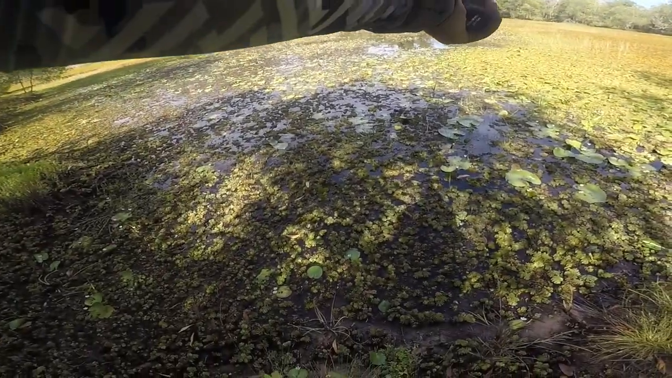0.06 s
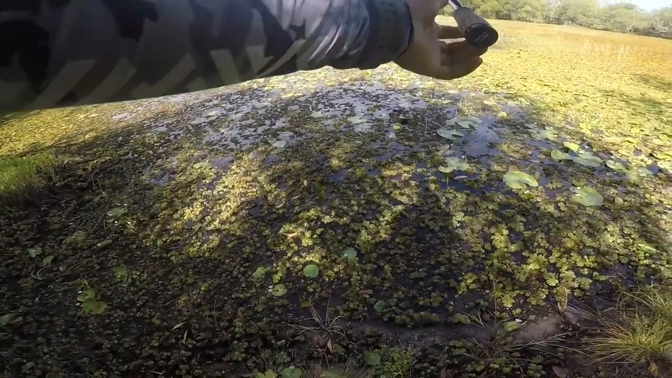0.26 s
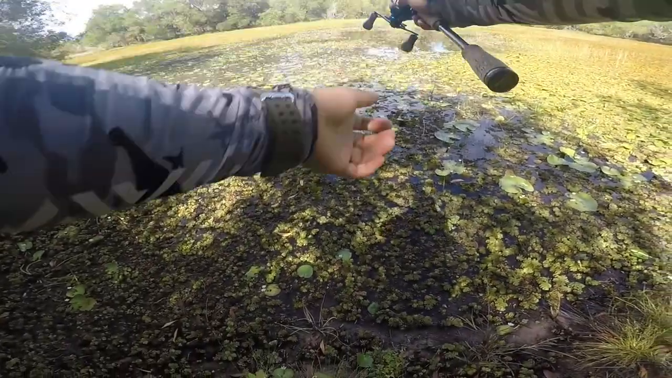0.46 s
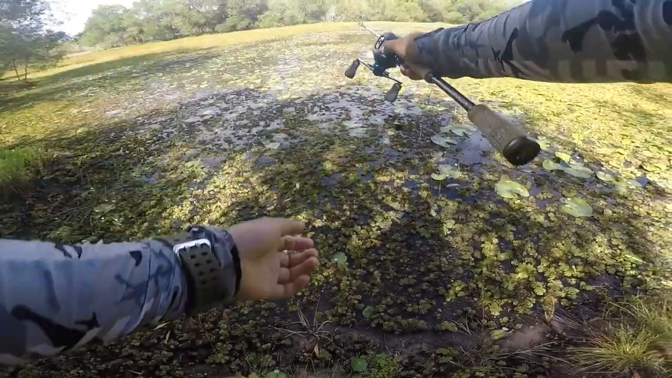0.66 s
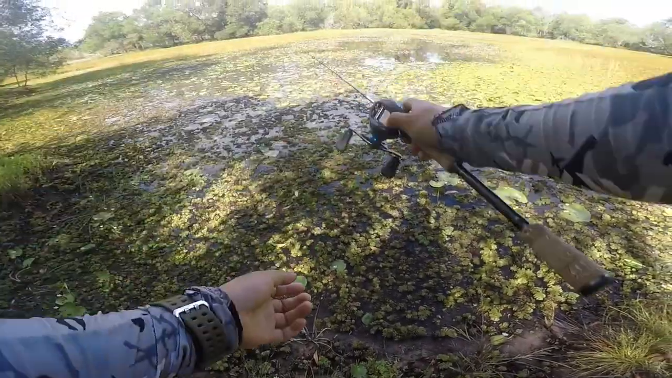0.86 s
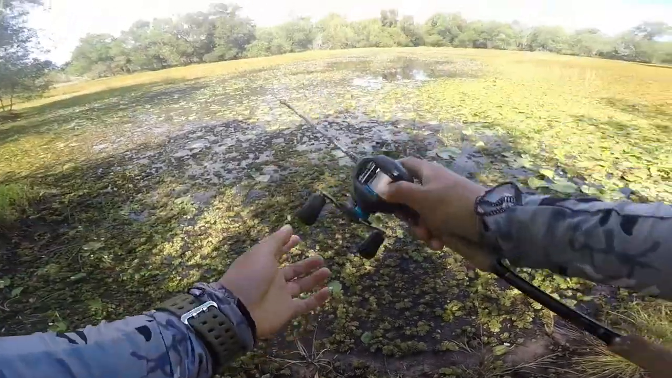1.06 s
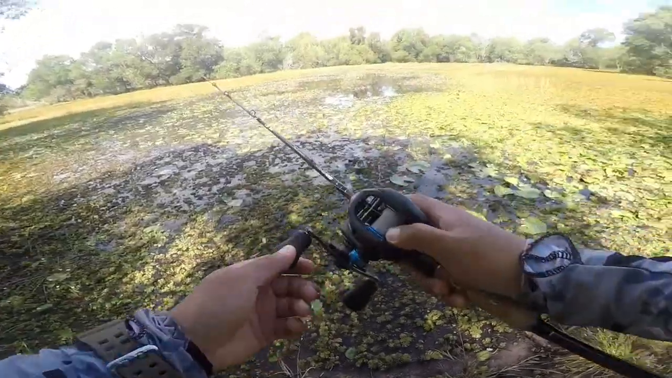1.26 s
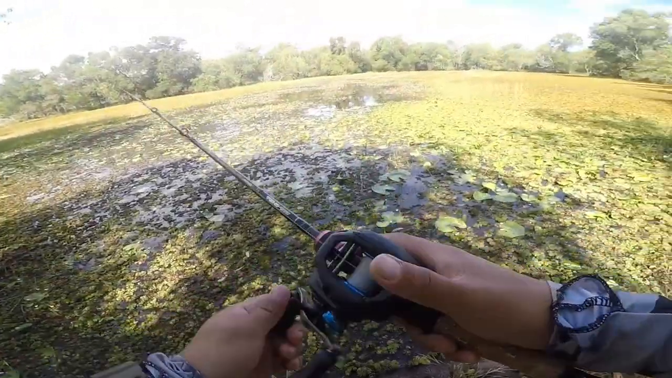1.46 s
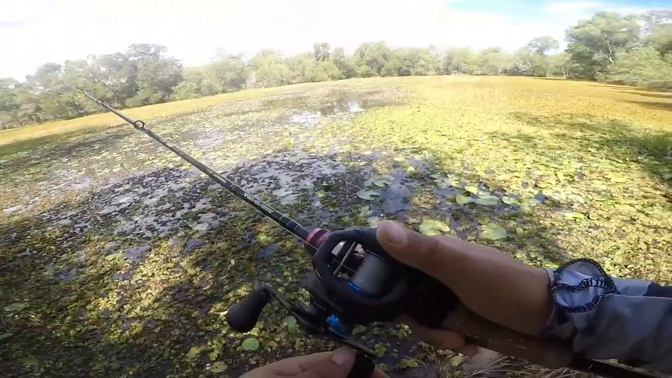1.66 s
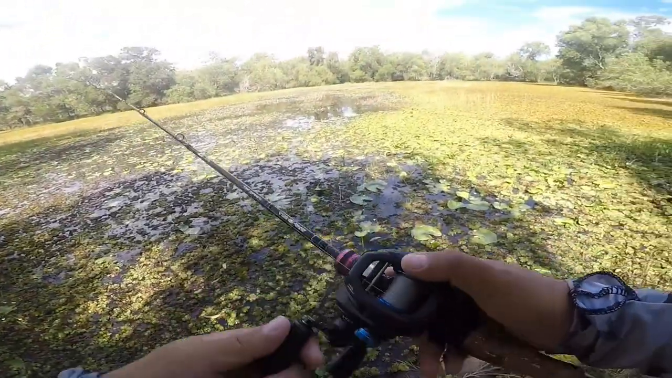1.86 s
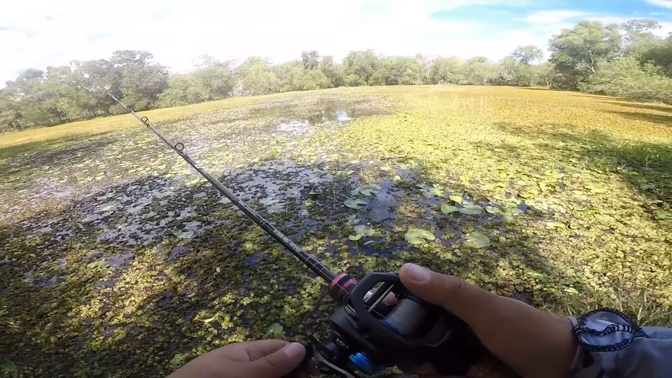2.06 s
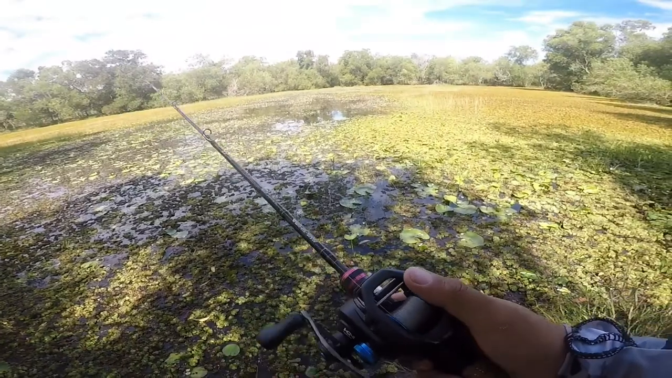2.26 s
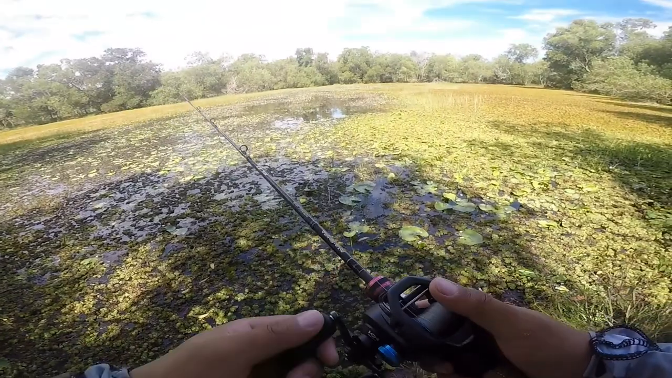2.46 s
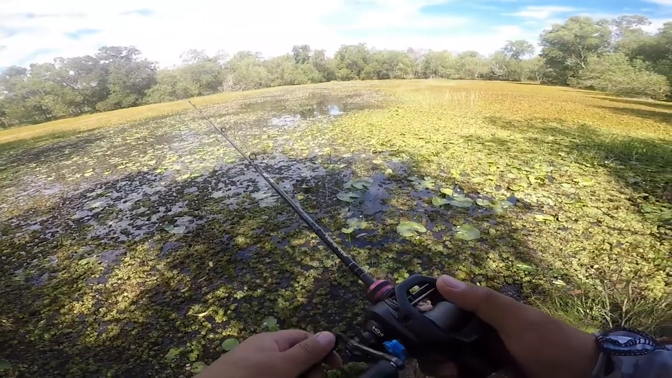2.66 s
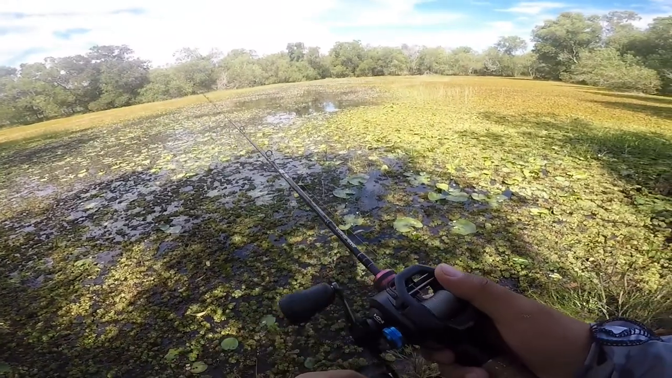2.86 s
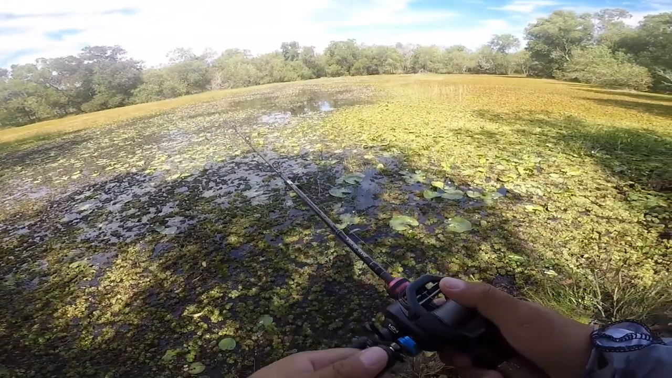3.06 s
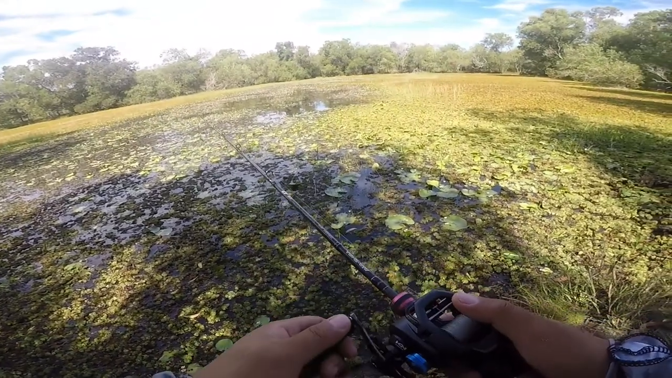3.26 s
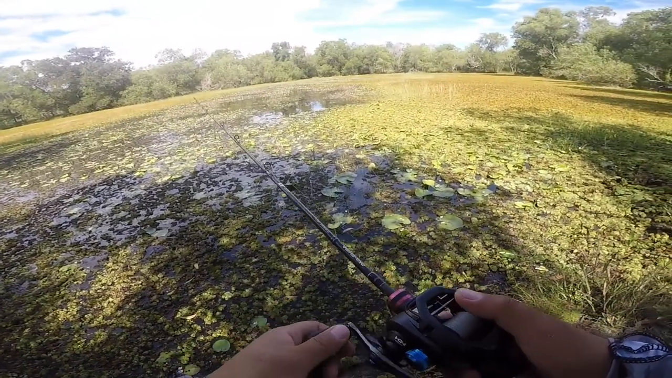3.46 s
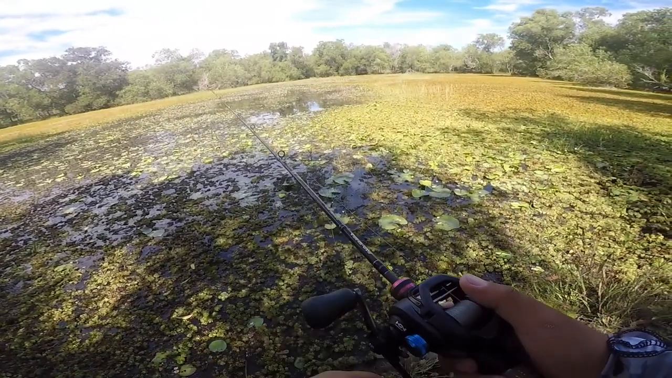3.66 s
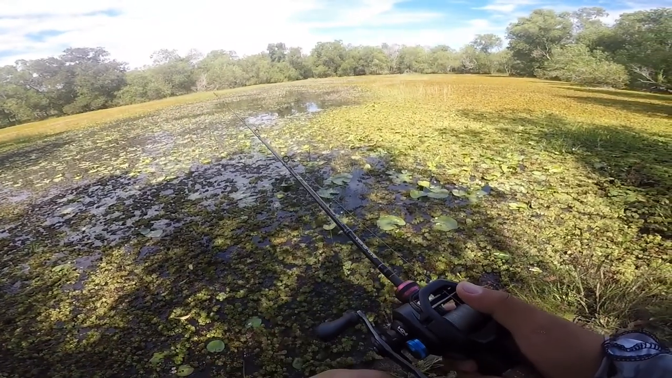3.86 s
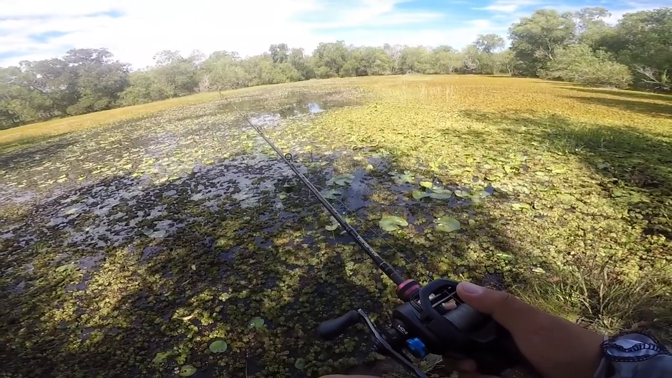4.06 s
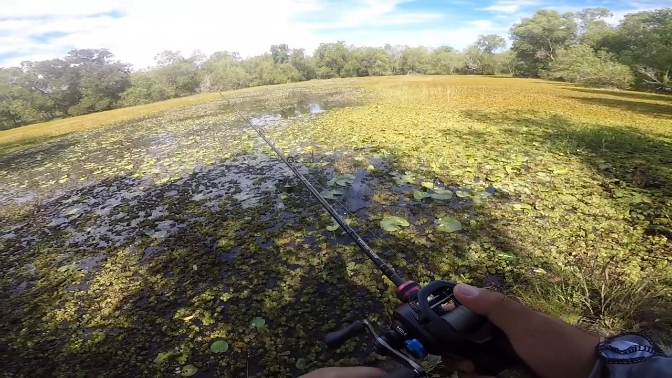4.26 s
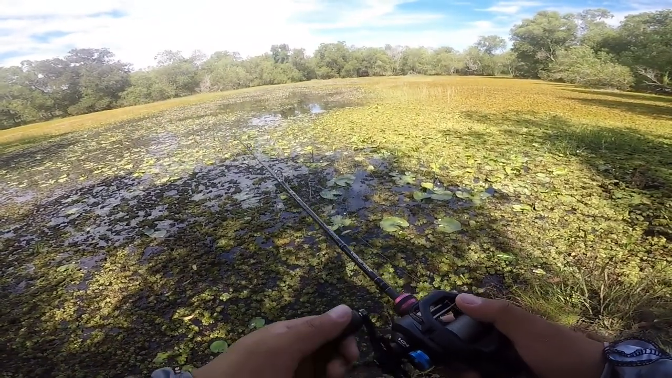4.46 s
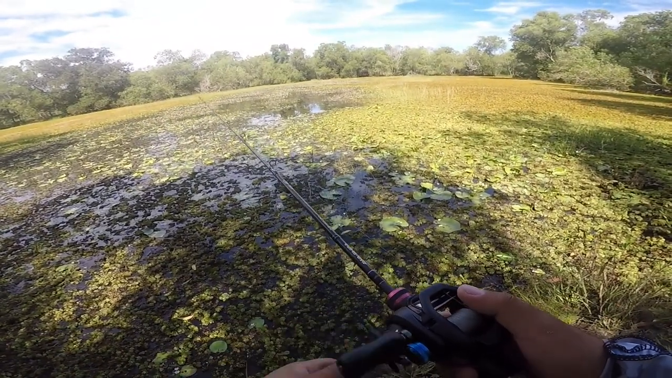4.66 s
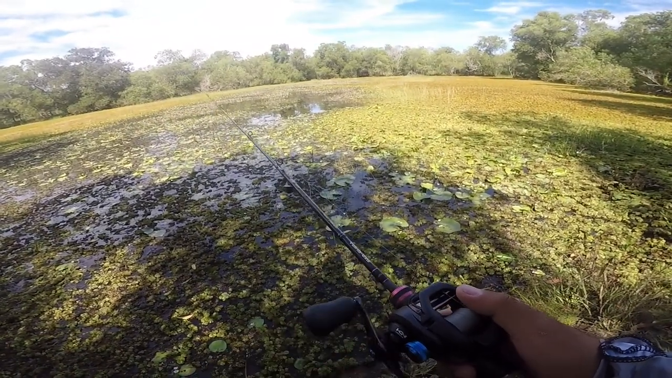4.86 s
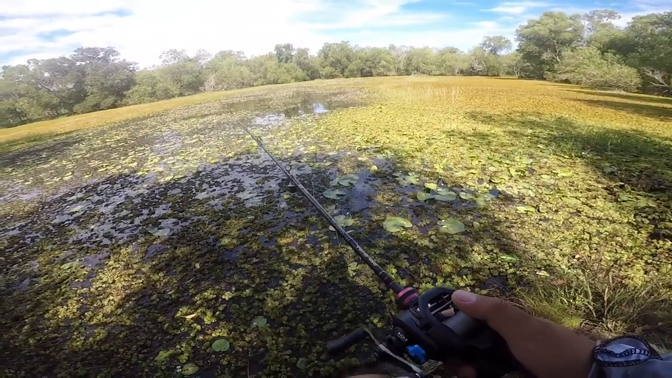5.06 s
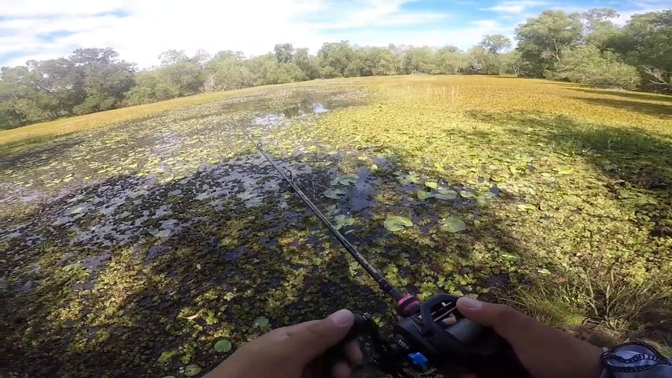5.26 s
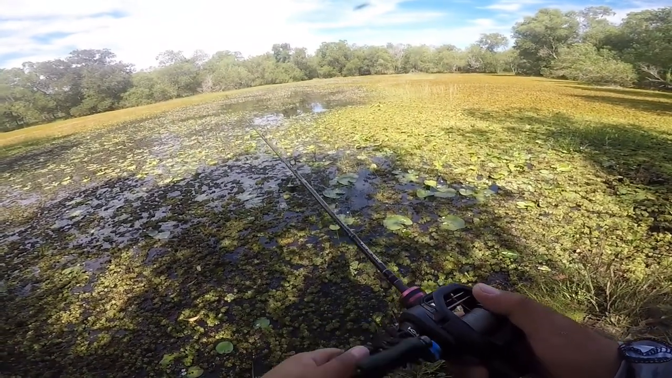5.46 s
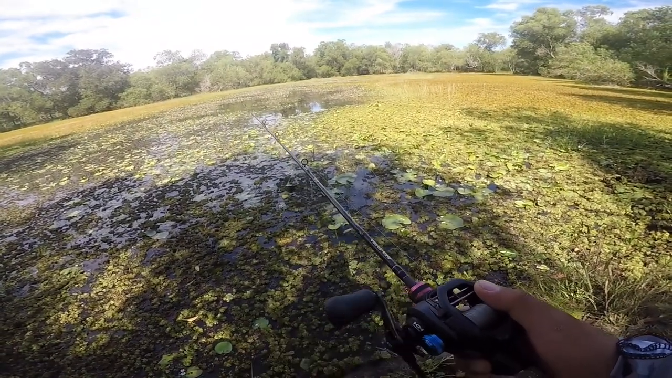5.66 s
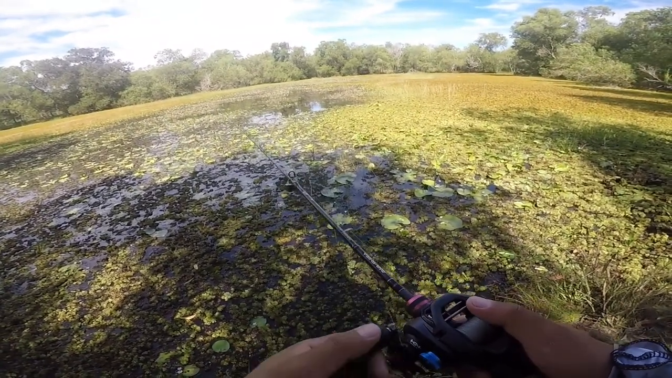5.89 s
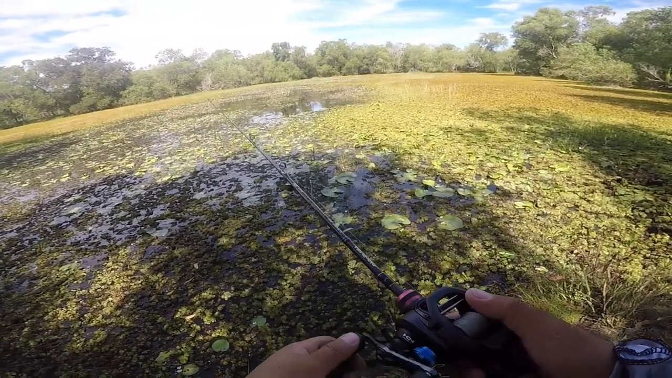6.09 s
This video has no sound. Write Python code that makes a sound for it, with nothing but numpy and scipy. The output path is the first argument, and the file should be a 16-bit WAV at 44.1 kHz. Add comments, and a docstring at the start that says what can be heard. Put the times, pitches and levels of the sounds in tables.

```python
"""Reel clutch and rubbed camera at a swamp

An angler with a chest camera follows through a cast. Sleeves and harness rub, bump and tick on its housing:
noise and pulses ring resonances. The reel's clutch snaps in: short cracks ring the frame.
Far birds whistle as gliding sines, insects trill on the right as pulsed tones, breeze and rumble are shaped noise.
Two microphone ports hear the mid range of far song and air nearly in opposite phase.
"""
import sys
import numpy as np
from scipy import signal
from scipy.fft import rfft, irfft, next_fast_len
from scipy.io import wavfile
from scipy.ndimage import uniform_filter1d, map_coordinates

SR = 44100
rng = np.random.default_rng(int(sys.argv[2]) if len(sys.argv) > 2 else 0)


def to_wav(s):
    """Save 16-bit WAV."""
    ch = np.atleast_2d(s).T  # columns
    pcm = np.round(np.clip(ch, -1, 1) * 32767)  # PCM
    wavfile.write(sys.argv[1], SR, pcm.astype(np.int16))


N = 270333

# housing resonances, low to high: case, strap, shell, crisp edge of a tick
# [f/Hz, width of one pass/Hz, ports alike/dB, ports opposed/dB]
CASE_MODES = [(160.9, 64, -1, -28), (209.6, 134, -3, -9.5), (271.3, 102, -11, -10.5)]
STRAP_MODES = [(282, 230, -10, -21.5), (378.8, 33, -7.5, 7.5), (528, 145, -2, 1.5), (656, 27, -3, -9)]
SHELL_MODES = [(875, 256, -11, 0), (1070, 196, -5.5, 5.5), (1283, 200, -5, 4), (1414, 140, -4.5, -14),
               (1648, 226, -6.5, -19), (1914, 220, -10, 1.5), (2177, 210, -16, -14), (2512, 150, -8.5, -19),
               (2735, 156, -9.5, -14), (3540, 280, -18, -33), (6400, 3200, -21, -20)]
RATTLE_MODES = [(1095, 320, -12, -4.5), (1806, 840, -18, -13), (2710, 370, -21.5, -44)]


def amp(db):
    """Amplitude factor of a level in dB."""
    return 10 ** (np.asarray(db) / 20)


def unit(x):
    """x scaled to an rms of 1 over all its rows."""
    return x / np.sqrt(np.mean(x ** 2) + 1e-20)


def along(points, hz):
    """Interpolate (f/Hz, value) points on a log frequency axis."""
    f, v = np.transpose(points)
    return np.interp(np.log(hz + 1), np.log(f + 1), v)


def curves(rows):
    """One value per sample for each column after the time."""
    s, *cols = np.transpose(rows)
    return [np.interp(np.arange(N) / SR, s, c) for c in cols]


def wobble(knots_per_s):
    """Smooth random curve through normal knots."""
    knots = rng.standard_normal(int(N * knots_per_s / SR) + 4)
    return map_coordinates(knots, [np.arange(N) * knots_per_s / SR])


def filtered(x, response):
    """x times a complex response of frequency."""
    m = next_fast_len(N + SR // 2)
    return irfft(rfft(x, m) * response(np.fft.rfftfreq(m, 1 / SR)), m)[..., :N]


def housing():
    """Drag, bumps and ticks drive the same resonances; the two motions become left and right."""
    alike, opposed = (drag() + bumps() + ticks()) / np.sqrt(2)
    return np.array([alike + opposed, alike - opposed])


def drag():
    """Cloth friction: low push on the case, strap creak, scrape on the shell, threads snapping free."""
    # cloth over the housing [t/s, push level/dB, scrape level/dB]
    rub = [(0.0, -44.5, -48), (0.15, -40, -39.5), (0.2, -43.5, -44.5), (0.25, -36, -35.5),
           (0.28, -39.5, -40.5), (0.308, -49, -43), (0.316, -41, -32), (0.36, -29.5, -34),
           (0.385, -46, -38), (0.425, -35.5, -38.5), (0.443, -38, -32.5), (0.455, -42, -37.5),
           (0.53, -36.5, -39.5), (0.63, -41, -40), (0.665, -45, -36.5), (0.7, -39, -41.5),
           (0.77, -35.5, -31), (0.81, -32, -34), (0.83, -32.5, -43), (0.87, -36, -34), (0.885, -46, -38),
           (0.95, -35, -33.5), (1.05, -34.5, -36.5), (1.14, -38, -36), (1.2, -32, -35), (1.28, -35, -32.5),
           (1.33, -46.5, -43), (1.45, -49.5, -51.5), (1.62, -50, -49), (1.66, -45, -42.5), (1.87, -46, -45),
           (1.95, -50, -56), (2.08, -50, -50), (2.25, -49.5, -67), (2.31, -49, -48), (2.37, -45, -48),
           (2.48, -45.5, -45), (2.52, -51.5, -56), (2.7, -48.5, -52), (2.82, -54, -58), (3.0, -49.5, -51),
           (3.04, -48, -42), (3.075, -52, -45), (3.1, -51, -46), (3.25, -49.5, -52), (3.4, -52.5, -61.5),
           (6.13, -53, -55)]
    strap_under_push_db, crackle_under_scrape_db = 8.5, 6
    fidget_db, fidget_knots_per_s = 0.96, 9.8
    snaps_per_s = 260
    push_db, scrape_db = curves(rub)
    strap_db = push_db - strap_under_push_db
    push_db, strap_db, scrape_db = (
        db + fidget_db * wobble(fidget_knots_per_s) for db in (push_db, strap_db, scrape_db))

    push = through(fibres(spread_db=1.8, clumps_per_s=40, tie=0.23), CASE_MODES)
    creak = through(fibres(spread_db=2.5, clumps_per_s=60, tie=0.29), STRAP_MODES)
    scrape = through(fibres(spread_db=2.7, clumps_per_s=150, tie=-0.022), SHELL_MODES)
    snaps = (rng.random(N) < snaps_per_s / SR) * rng.standard_normal((2, N))
    crackle = through(snaps, RATTLE_MODES)

    touch = amp(push_db) * unit(push) + amp(strap_db) * unit(creak)
    touch = touch + amp(scrape_db) * unit(scrape)
    return touch + amp(scrape_db - crackle_under_scrape_db) * unit(crackle)


def fibres(spread_db, clumps_per_s, tie):
    """Friction force: clumped grains; tie is the correlation between alike and opposed motion."""
    grain_db = 2.2  # size scatter of single fibres catching
    a, b = rng.standard_normal((2, N))
    size_db = spread_db * wobble(clumps_per_s) + grain_db * rng.exponential(size=N)
    return unit(np.array([a, tie * a + np.sqrt(1 - tie ** 2) * b]) * amp(size_db))


def bumps():
    """Soft contact: a raised-sine force pulse shakes case and strap."""
    # bumps [t/s, case drive/dB, strap drive above it/dB, contact time/s, clipped below]
    hits = [(0.033, -37.5, -5, 0.0029), (0.356, -29.5, -4.5, 0.0017), (0.43, -15.5, -3, 0.0064),
            (0.774, -36, -9, 0.002), (0.782, -28, -5, 0.002), (0.795, -35, -1, 0.0016),
            (0.811, -25.5, -22, 0.0035), (0.839, -31, -8, 0.0015), (0.85, -29, -14, 0.002),
            (0.858, -34, -5, 0.0011), (0.865, -28, -22, 0.0029), (0.969, -15, -18, 0.002),
            (1.204, -16, 2, 0.004), (1.25, -25, -27, 0.0022), (1.368, -26.5, -2.5, 0.0026),
            (1.385, -25.5, -22, 0.0046), (1.566, -18.5, -33, 0.0048), (1.653, -30, -19, 0.0026),
            (1.751, -19.5, -39, 0.003), (1.772, -25, -26, 0.0017), (1.838, -33, -21, 0.0034),
            (1.924, -31.5, -20, 0.0025), (1.967, -25, -31, 0.0053), (2.011, -29, -31, 0.004),
            (2.049, -19.5, -35, 0.0049), (2.181, -17, -11, 0.0054), (2.415, -34, -20, 0.00047),
            (2.459, -37, -7, 0.0024), (2.546, -15, -21, 0.0071), (2.683, -21.5, -33, 0.0059),
            (2.718, -30, -22, 0.0035), (3.079, -32, -4, 0.0029), (3.122, -35, -7, 0.0018),
            (3.145, -39, -10, 0.0023), (3.618, -25, -24, 0.0054), (3.803, -35.5, -10, 0.0022),
            (4.623, -31.5, -19, 0.0046), (6.075, -23.5, -24, 0.0039)]
    thumps, creaks = np.zeros((2, N + SR))
    t = np.arange(SR // 100) / SR
    for s, db, above_db, contact_s in hits:
        blow = np.sin(np.pi * np.clip(t / np.clip(contact_s, .0005, .009), 0, 1)) ** 2
        blow = blow / blow.sum()  # same impulse whatever the contact time
        here = slice(round(s * SR), round(s * SR) + len(t))
        thumps[here] += amp(db + 47.5) * blow
        creaks[here] += amp(db + above_db + 52.0) * blow
    return through(thumps[:N], CASE_MODES) + through(creaks[:N], STRAP_MODES)


def ticks():
    """Dry contact: an impulse with scratch rattles crisply; a softened copy rings shell and strap."""
    # ticks on the shell [t/s, drive/dB, hardness/dB]
    taps = [(0.031, -27, 1), (0.095, -43, 1), (0.13, -40, 2), (0.25, -34, -2), (0.311, -32, -4),
            (0.326, -33, -6), (0.746, -30, -0.5), (0.798, -24, 3), (0.806, -28.5, -1.5), (0.841, -42, -7),
            (0.851, -37, -3), (0.858, -31, -1), (0.966, -14.5, -1), (1.075, -28.5, -1), (1.207, -32, -9),
            (1.569, -33, 2), (1.632, -44, -1), (1.755, -29, 1.5), (1.778, -28, 2.5), (1.902, -38, -1.5),
            (1.967, -36, -2), (2.011, -24.5, 4.5), (2.052, -35.5, -5), (2.078, -33, 1), (2.106, -34, 1),
            (2.185, -35, -3), (2.312, -38, 2.5), (2.322, -45, 1), (2.343, -43, 5), (2.365, -44, 5),
            (2.411, -25.5, 2.5), (2.426, -33, 2.5), (2.546, -31, 3), (2.555, -37, 0), (2.617, -39, 0),
            (2.691, -36, -1.5), (2.876, -41, -3), (2.937, -38, -1.5), (2.974, -48, 0), (3.026, -42, 4),
            (3.042, -38.5, 2), (3.055, -39, 2), (3.06, -39, 1), (3.098, -35, 3.5), (3.128, -43, 5),
            (3.179, -31.5, 1.5), (3.189, -38, -1), (3.25, -53, 0), (3.289, -39, -1), (3.541, -37, -1),
            (3.619, -36.5, -1), (4.783, -39.5, -0.5), (5.431, -35.5, 2.5), (5.565, -35, 2.5),
            (5.954, -40, 0.5), (6.076, -26.5, 0)]
    soft_hz, strap_db, ring_db = 2460, -3.5, -6
    force = np.zeros((2, N + SR))
    t = np.arange(SR // 100) / SR
    grit = rng.standard_normal((len(taps), len(t))) * amp(-60 * t / 0.014)
    for k, ((s, db, hardness_db), scratch) in enumerate(zip(taps, grit)):
        snap = signal.unit_impulse(len(t)) + 0.26 * scratch
        # a harder contact adds its slope
        snap = snap + 2.95 * (amp(hardness_db) - 1) * np.gradient(snap)
        # alternate sides: the opposed motion flips sign
        force[:, round(s * SR):][:, :len(t)] += amp(db + 35.5) * np.outer([1, (-1) ** k], snap)
    force = force[:, :N]
    soft = filtered(force, lambda f: 0.61 / (1 + 1j * f / soft_hz) ** 3)
    ring = amp(ring_db) * through(soft, SHELL_MODES)
    shake = amp(strap_db) * through(soft, STRAP_MODES)
    return through(force, RATTLE_MODES) + ring + shake


def through(force, modes):
    """Force through resonances, the camera's low cut and a soft treble roll-off."""
    low_cut_hz, q, roll_off_hz = 143, 0.96, 6000

    def response(f):
        u = f / low_cut_hz
        low_cut = (1j * u) ** 2 / (1 + 1j * u / q - u ** 2)
        return resonant(modes, f) * low_cut ** 3 / (1 + 1j * f / roll_off_hz) ** 2

    return filtered(force, response)


def resonant(modes, f):
    """Causal resonances, each applied twice for steep skirts; rows: ports alike, ports opposed."""
    total = 0
    for hz, width_hz, alike_db, opposed_db in modes:
        peak = 1j * f * width_hz / (hz * hz - f * f + 1j * f * width_hz)
        total = total + amp([[alike_db], [opposed_db]]) * peak ** 2
    return total


def clutch():
    """Each contact is a short crack that rings the reel frame, differently toward each port."""
    # clutch contacts [t/s, drive/dB, ring at 3.4-6.5 kHz above it/dB, treble and crack above it/dB]
    contacts = [(1.3551, -9.5, -9, -1), (1.3675, -7.5, -7, -3.5), (1.3699, -6, 6, 5), (1.3722, -12, 1, 5),
                (1.375, -8, -10, -6)]
    # reel frame modes [f/Hz, level/dB, twice the 60 dB decay time/s]
    reel = [(516, -10.5, 0.022), (1140, -21, 0.018), (1555, -10, 0.038), (1930, -8, 0.024),
            (2250, 2, 0.0089), (2720, -4, 0.019), (3000, 4.5, 0.018), (3660, 3, 0.011), (4220, 2.5, 0.0088),
            (5550, 10, 0.01), (6160, 4, 0.01), (7340, 3, 0.0082), (8100, -5, 0.016), (9200, -10.5, 0.015),
            (11100, -16, 0.0057), (12500, -33, 0.012)]
    # balance of the reel [f/Hz, left minus right/dB]
    reel_lean = [(700, -3), (1300, 8), (2400, -4), (7000, -1), (10000, -11), (15000, 1)]
    low_cut_hz = 457  # the small frame radiates little below this
    out, t = np.zeros((2, N)), np.arange(SR // 10) / SR
    hz, level_db, twice_t60_s = np.transpose(reel)[..., None]
    for s, db, middle_db, treble_db in contacts:
        start = 2 * np.pi * rng.random(hz.shape)
        for port, turn in zip(out, (1, -1)):
            tilt_db = np.where(hz > 6500, treble_db, middle_db * (hz > 3400))
            tilt_db = tilt_db + rng.normal(0, 0.73, hz.shape)
            decay = amp(level_db + tilt_db - 60 * t / (.5 * twice_t60_s))
            ring = decay * np.sin(2 * np.pi * hz * t + start + 0.72 * turn)
            noise = uniform_filter1d(rng.standard_normal(len(t)), size=3)
            crack = 0.55 * amp(treble_db - 60 * t / 0.021) * noise
            attack = 1 - np.exp(-t / 0.00066)
            port[round(s * SR):][:len(t)] += amp(db - 7.5) * (ring.sum(0) + crack) * attack

    def radiation(f):
        return (1j * f / (low_cut_hz + 1j * f)) ** 2 * amp(along(reel_lean, f) / [[2], [-2]])

    out = filtered(out, radiation)
    tail = amp(-60 * t / 0.15) * rng.standard_normal((2, len(t)))
    return out + amp(-20) * reverberated(out, tail)


def reverberated(x, tail):
    """Convolve with a decaying noise tail, scaled to unit energy by its left row."""
    return signal.fftconvolve(x, tail / np.linalg.norm(tail[0]), axes=1)[:, :N]


def birds():
    """Far song is smeared by the trees on its way; peeps come clear across the water."""
    # calls that shoot up and drop again [top t/s, top f/Hz, rise/s, fall/s, drive/dB]
    arches = [ (1.902, 5780, .032, .033, -64), (2.507, 6120, .004, .028, -61),
              (3.018, 6000, .028, .032, -59), (3.522, 5900, .004, .028, -59),
              (4.011, 5650, .028, .024, -62), (4.488, 5900, .004, .03, -62), (4.562, 5250, .003, .018, -60),
              (5.078, 6140, .03, .034, -59), (5.692, 6170, .004, .03, -60)]
    # gliding notes [start t/s, length/s, first f/Hz, middle f/Hz, last f/Hz, drive/dB]
    notes = [(0.0, 0.13, 4260, 4175, 4145, -64), (0.128, 0.04, 4145, 4060, 3970, -56.5),
             (0.172, 0.05, 4160, 4030, 4030, -67), (0.274, 0.04, 3450, 4500, 5100, -64),
             (2.124, 0.086, 4280, 4230, 4220, -66), (2.168, 0.021, 4000, 3850, 3650, -58),
             (2.173, 0.038, 3610, 3460, 3330, -60.5), (2.202, 0.03, 3650, 3730, 3700, -68),
             (2.386, 0.025, 3450, 3330, 3200, -68), (2.223, 0.012, 2970, 2900, 2850, -61),
             (2.43, 0.048, 4100, 4280, 4530, -67), (2.475, 0.063, 3700, 3420, 3460, -63),
             (2.482, .02, 3980, 3960, 3940, -65), (2.705, 0.02, 3200, 3500, 3850, -63),
             (2.722, 0.026, 3950, 3794, 3870, -60), (2.726, 0.027, 4020, 4060, 4000, -66),
             (2.874, 0.02, 3250, 3160, 3050, -66), (3.012, 0.034, 5250, 4940, 4550, -65),
             (3.053, .035, 5480, 5500, 5480, -69), (3.608, .006, 4700, 4350, 4000, -60),
             (3.3, .06, 4150, 4130, 4150, -69), (2.87, 0.055, 2760, 2770, 3280, -67),
             (3.15, 0.14, 4300, 4170, 4160, -69.5), (3.26, 0.07, 4080, 3950, 3830, -64),
             (3.339, 0.027, 3500, 3090, 2970, -60.5), (3.387, 0.014, 3180, 3450, 3800, -59.5),
             (3.404, 0.022, 4350, 4520, 4630, -58.5), (3.506, 0.03, 3850, 3870, 3700, -65),
             (3.475, 0.023, 3590, 3650, 3800, -58), (3.888, 0.045, 5020, 5040, 5100, -66),
             (3.942, .045, 5200, 5210, 5260, -63), (4.029, 0.03, 4950, 5000, 5150, -62),
             (3.905, 0.024, 3450, 3490, 3350, -62), (3.908, 0.022, 3900, 3780, 3650, -62),
             (3.945, 0.03, 4700, 4750, 4750, -70), (3.933, .022, 3850, 3800, 3750, -65),
             (4.044, .012, 4800, 4750, 4700, -64), (4.062, .014, 2800, 2720, 2700, -63),
             (4.045, 0.021, 3640, 3600, 3450, -63.5), (4.19, 0.049, 3310, 3060, 2360, -67),
             (4.499, .05, 4140, 3740, 3500, -60), (4.645, 0.16, 4190, 4190, 4130, -66),
             (4.803, 0.085, 4130, 4140, 4210, -63), (4.878, 0.04, 3600, 3390, 3330, -62),
             (4.724, .018, 3300, 3370, 3400, -67), (4.742, 0.025, 3580, 3590, 3560, -64.5),
             (4.808, .05, 3950, 3930, 3920, -69), (4.897, .016, 3200, 3010, 2930, -60),
             (4.884, 0.053, 4010, 3594, 3900, -58), (4.943, 0.012, 3000, 3400, 3800, -64),
             (4.935, .038, 3850, 4150, 4700, -62), (4.972, .02, 4650, 4500, 4450, -64),
             (5.185, .03, 2030, 1930, 1800, -68), (5.377, 0.062, 3470, 3550, 4050, -70),
             (5.476, 0.108, 5150, 5185, 5170, -65.5), (5.584, .045, 5170, 5140, 5050, -70),
             (5.52, .015, 3850, 3750, 3700, -66), (5.579, 0.024, 5050, 4100, 3200, -64),
             (5.62, .035, 3900, 3750, 3600, -67), (5.635, .02, 3400, 3300, 3250, -66),
             (5.72, 0.023, 3960, 3800, 3680, -64), (5.89, .04, 4070, 4220, 4260, -71),
             (6.033, 0.065, 3340, 3080, 3260, -64)]
    # level peeps of one bird [start t/s, end t/s]
    peep_times = [(2.705, 2.806), (2.853, 2.98), (3.106, 3.236), (3.28, 3.408), (3.452, 3.58), (3.665, 3.8)]
    # low clear whistles [start t/s, length/s, first, middle, last f/Hz, level/dB, left minus right/dB]
    low_notes = [ (1.662, .06, 2160, 2060, 1980, -59, 0), (1.837, .077, 1733, 1705, 1600, -57, 0),
                 (2.615, .07, 2200, 2050, 1880, -60, 0), (4.69, .105, 2250, 2290, 2450, -60, -6),
                 (4.922, .04, 1700, 1830, 1950, -59, -5), (4.961, .028, 2100, 2280, 2380, -53, -5),
                 (4.988, .025, 2450, 2530, 2600, -57, -5), (5.082, .075, 1740, 1710, 1590, -59, 10),
                 (5.156, .045, 1590, 1450, 1390, -55, 8)]
    peep_hz, peep_drive_db = 5500, -69
    trunk_db, echo_db = -17, 3

    song = whistle([arch(*row) for row in arches] + [glide(*row) for row in notes])
    peeps = whistle([[(a, peep_hz, peep_drive_db), (b, peep_hz, peep_drive_db)] for a, b in peep_times],
                    flutter_db=1.0, waver_hz=8.2)
    low = np.zeros((2, N))
    for *row, pan_db in low_notes:
        low += whistle([glide(*row)], flutter_db=1, waver_hz=5) * amp([[pan_db / 2], [-pan_db / 2]])

    t = np.arange(SR // 3) / SR
    woods = amp(-60 * t / 0.46) * rng.standard_normal((2, len(t)))
    echo = reverberated(song[None], woods)
    flock = whistle(chatter(count=45, floor_db=-73, low_hz=2750, octaves=0.56))
    flock = reverberated(flock[None], woods)
    # delayed copies off near trunks
    paths = signal.unit_impulse(SR // 30)
    paths[rng.integers(SR // 400, SR // 60, size=7)] = amp(trunk_db) * rng.standard_normal(size=7)
    song = signal.fftconvolve(song, paths / np.linalg.norm(paths))[:N]
    direct = amp(6.0) * ports(song, np.array([song, 0.34 * song]))
    return direct + amp(echo_db) * echo + flock + low + peeps * amp([[7], [5]])


def whistle(notes, flutter_db=2, waver_hz=18):
    """Each note is a sine of wavering pitch; the level of the whole flutters."""
    song, waver = np.zeros(N), waver_hz * wobble(90)
    for note in notes:
        s, hz, db = np.transpose(note)
        t = np.arange(s[0], s[-1], 1 / SR)
        here = slice(round(s[0] * SR), round(s[0] * SR) + len(t))
        fade = np.clip(np.minimum(t - s[0], s[-1] - t) / 0.00087, 0, 1)
        pitch_hz = np.interp(t, s, hz) + waver[here]
        tone = np.sin(2 * np.pi * np.cumsum(pitch_hz) / SR)
        song[here] += fade * amp(np.interp(t, s, db)) * tone
    return song * amp(flutter_db * wobble(60))


def arch(top_s, top_hz, rise_s, fall_s, db):
    """Pitch climbs to the top and drops at one steady speed."""
    slope_hz_per_s, edge_db = 53000, -3.5
    return [(top_s - rise_s, top_hz - slope_hz_per_s * rise_s, db + edge_db),
            (top_s, top_hz, db),
            (top_s + fall_s, top_hz - slope_hz_per_s * fall_s, db + edge_db)]


def glide(start_s, length_s, first_hz, middle_hz, last_hz, db):
    """Pitch bends smoothly through three values; the note is loudest in its middle."""
    edge_db = -3
    u = np.linspace(-1, 1, num=9)
    bend_hz = (first_hz + last_hz) / 2 - middle_hz
    hz = middle_hz + (last_hz - first_hz) / 2 * u + bend_hz * u ** 2
    return np.transpose([start_s + length_s * (u + 1) / 2, hz, db + edge_db * u ** 4])


def chatter(count, floor_db, low_hz, octaves):
    """Short random glides of a distant flock."""
    start, pitch, bend, size, loud = rng.random((count, 5)).T
    start_s = start * (N / SR - .1)
    end_s = start_s + 0.016 + 0.066 * size
    first_hz = low_hz * 2 ** (octaves * pitch)
    last_hz = first_hz * (0.94 + 0.31 * bend)
    level_db = floor_db + 7 * loud
    return [[(a, f, db), (b, g, db)]
            for a, b, f, g, db in zip(start_s, end_s, first_hz, last_hz, level_db)]


def ports(common, own):
    """Both ports hear the common part with their phase gap, and each a part of its own."""
    # phase gap [f/Hz, left leads/rad]
    lead = [(130, 0), (200, -.8), (480, -2.7), (1300, -3), (2300, -2.4), (3700, 0), (16000, 0)]
    # power common to both ports [f/Hz, share]
    shared = [(60, 0.68), (500, 1), (2000, 0.51), (3700, 0.66), (6000, 0.0084), (16000, 0.012)]

    def common_response(hz):
        left = np.exp(.5j * along(lead, hz))
        return np.sqrt(np.clip(along(shared, hz), 0, 1)) * np.array([left, 1 / left])

    def own_response(hz):
        return np.sqrt(1 - np.clip(along(shared, hz), 0, 1))

    return filtered(common, common_response) + filtered(own, own_response)


def insects():
    """A fast trill in short swelling phrases, another behind it and a slower steady one, all to the right."""
    # phrased trill [t/s, drive/dB, depth of phrase gaps/dB]
    trill = [(0, -62.5, 2), (1.5, -63.5, 3), (2.6, -60, 11), (4, -58.5, 13), (6.13, -59, 13)]
    phrase_start_s, phrases_per_s = 4.062, 7.29
    far_db, slow_db = -70, -66.5  # before the side gains
    db, gap_db = curves(trill)
    phrase = (np.arange(N) / SR - phrase_start_s) * phrases_per_s % 1
    hush = uniform_filter1d((phrase < .24) + .3 * (1 - phrase), size=500)
    near = amp(db - gap_db * hush + 0.96 * wobble(8.5)) * stridulation(
        pulses_per_s=127, carrier_hz=9103, glide_hz=950, sharp=0.56)
    behind = amp(far_db + 1.1 * wobble(7.3)) * stridulation(
        pulses_per_s=92, carrier_hz=8870, glide_hz=790, sharp=0.47)
    slow = amp(slow_db + 1.1 * wobble(1.41)) * stridulation(
        pulses_per_s=60, carrier_hz=8690, glide_hz=150, sharp=1.9)
    return (near + behind) * amp([[-11], [3]]) + slow * amp([[-6], [3]])


def stridulation(pulses_per_s, carrier_hz, glide_hz, sharp):
    """Wing strokes: each pulse is a tone gliding down around the carrier."""
    cycle = np.cumsum(pulses_per_s * (1 + .05 * wobble(25))) / SR % 1
    hz = carrier_hz + glide_hz * (.5 - cycle) + 40 * wobble(100)
    pulse = np.sin(np.pi * cycle) ** (2 * sharp)
    tone = np.sin(2 * np.pi * np.cumsum(hz) / SR)
    return unit(pulse * amp(0.98 * wobble(60)) * tone)


def air():
    """Breeze and far swamp: noise in time-frequency patches, with wind rumble under them."""
    # breeze and swamp spectrum [f/Hz, relative level per Hz/dB]
    spectrum = [(30, -47), (95, -39.5), (150, 9.5), (240, -12), (400, -9.5), (800, -10), (1300, -13.5),
                (2200, -19), (4000, -24), (6500, -24), (8000, -25), (10000, -27.5), (12000, -35.5),
                (15000, -42)]
    # insect haze on the right [f/Hz, left minus right/dB]
    haze_lean = [(5000, 0), (8500, -3), (13000, 0.5)]
    # wind rumble, partly common to both ports, dying down [t/s, level/dB]
    swell = [(0.0, -51.5), (1.26, -58.5), (1.67, -68), (2.3, -71), (3.0, -74), (6.13, -73)]
    hiss_db, hiss_top_hz = -46, 15200  # level and upper edge of the hiss

    z = signal.stft(rng.standard_normal((3, N)), nperseg=512)[2]
    patches = uniform_filter1d(rng.standard_normal(z.shape[1:]), 6, 0)
    patches = uniform_filter1d(patches, 10, 1)
    noise = signal.istft(z * amp(1.72 * unit(patches)), nperseg=512)[1][:, :N]
    hiss = filtered(noise, lambda hz: amp(along(spectrum, hz)) * (hz < hiss_top_hz))
    hiss = amp(hiss_db) * unit(hiss)
    swamp = filtered(ports(hiss[0], hiss[1:]), lambda hz: amp(along(haze_lean, hz) / [[2], [-2]]))

    rumble_db, = curves(swell)
    rumble_db = rumble_db + 2.4 * wobble(4.2)
    rumble = filtered(rng.standard_normal((3, N)), lambda hz: (hz / 60) ** 1.7 / (1 + (hz / 70) ** 4))
    rumble = amp(rumble_db) * unit(rumble)
    # one part common to both ports, a weaker one for each alone
    return swamp + rumble[0] + 0.54 * rumble[1:]


def scene():
    """Sum of all sources, left and right."""
    return housing() + clutch() + birds() + insects() + air()


def record(dry):
    """The camera keeps nothing above its band limit."""
    top_hz = 16500
    return filtered(dry, lambda hz: hz < top_hz)


dry = scene()
out = record(dry)
to_wav(out)
```